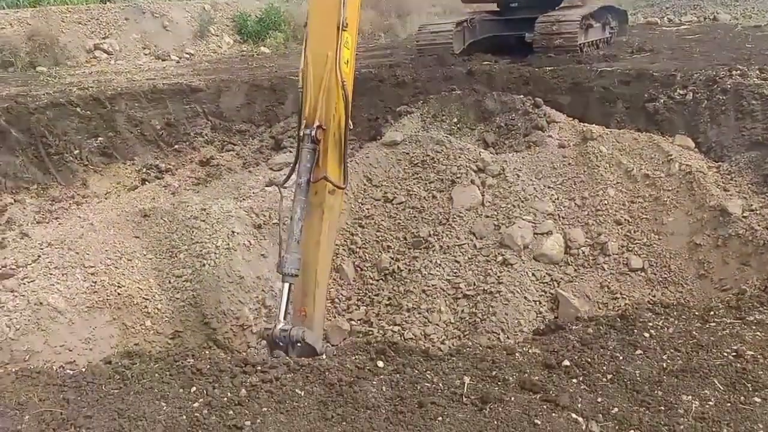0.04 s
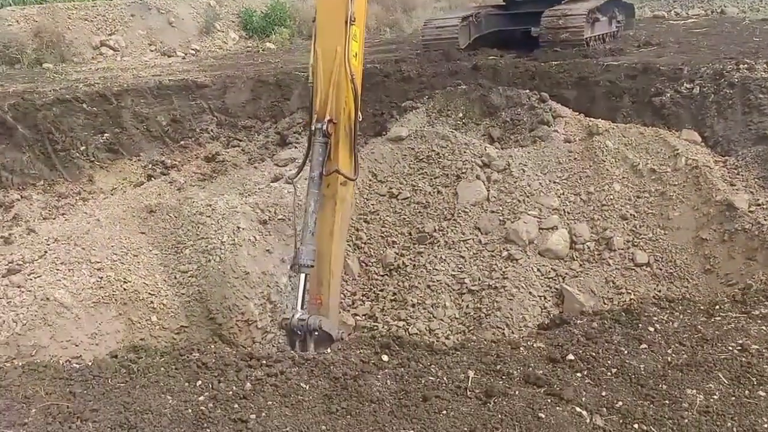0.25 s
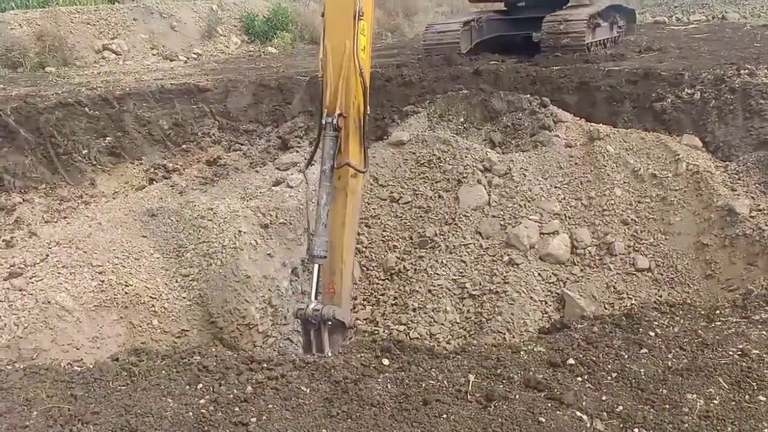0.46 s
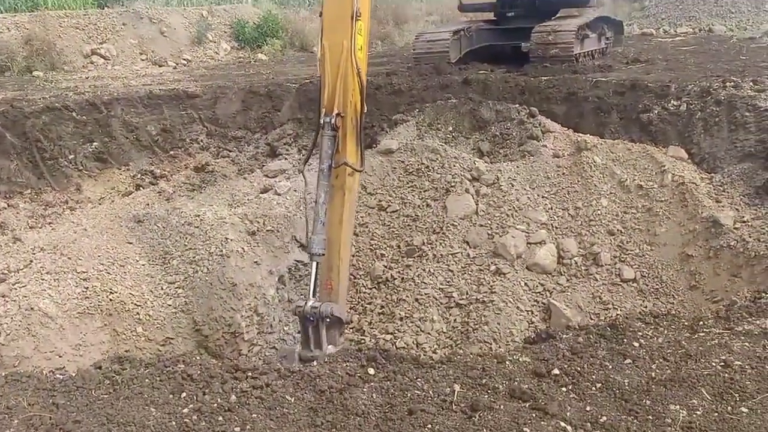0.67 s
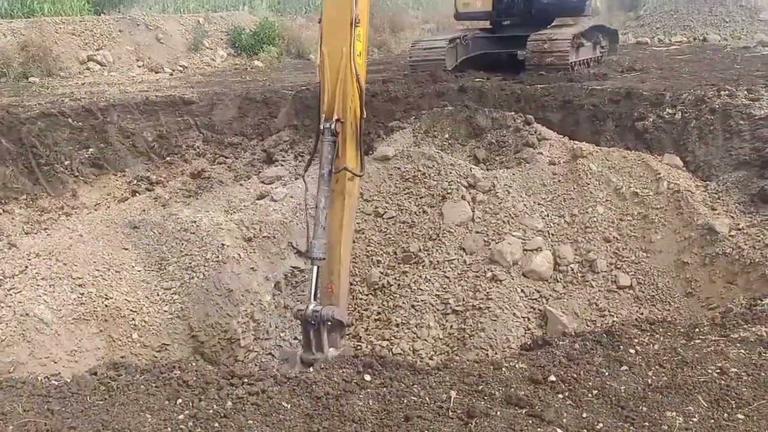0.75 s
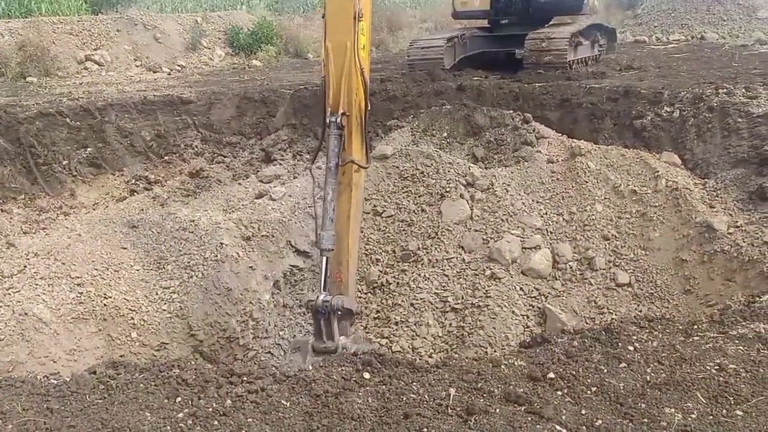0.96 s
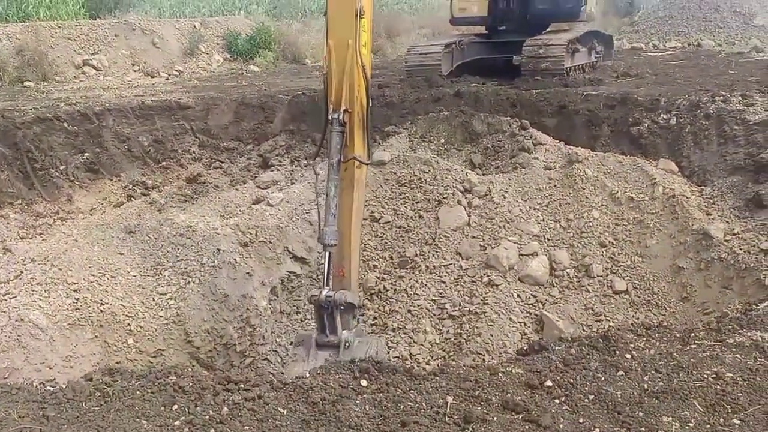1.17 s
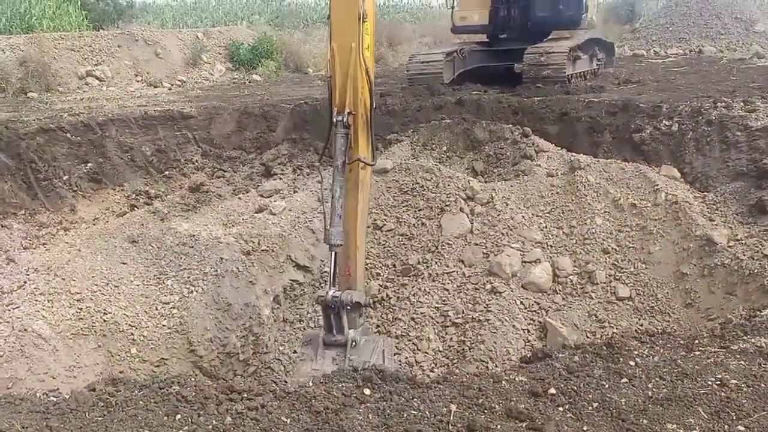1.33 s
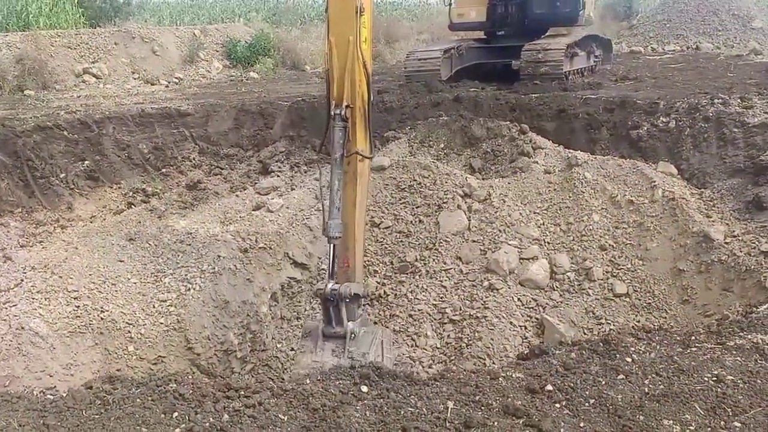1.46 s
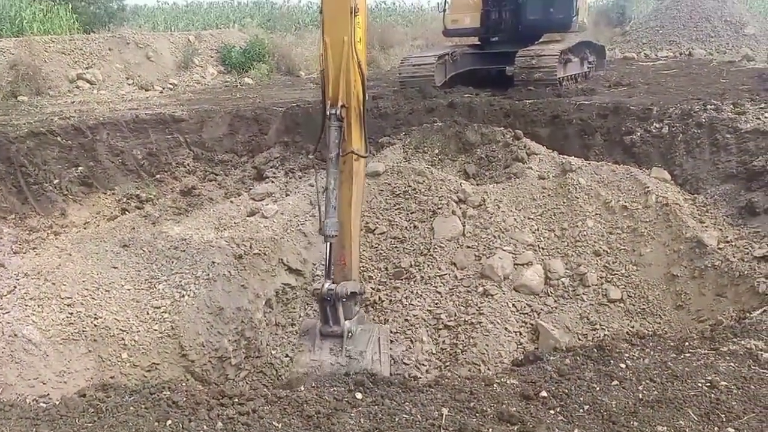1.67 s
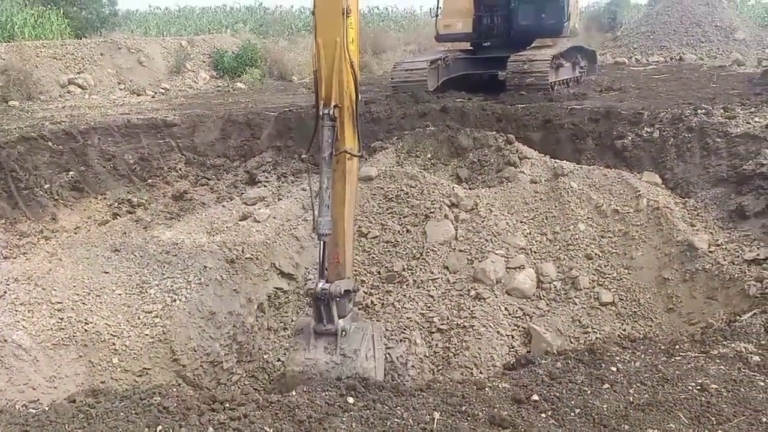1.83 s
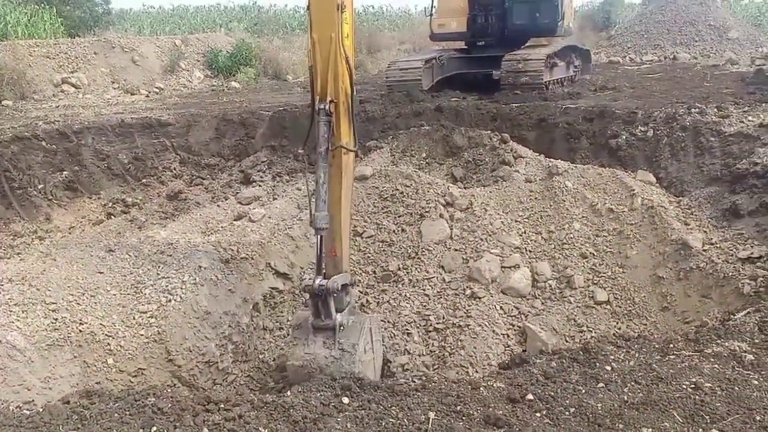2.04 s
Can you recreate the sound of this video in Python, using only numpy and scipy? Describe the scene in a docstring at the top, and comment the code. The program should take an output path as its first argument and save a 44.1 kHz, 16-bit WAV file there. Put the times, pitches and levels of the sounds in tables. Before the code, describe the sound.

An excavator bucket lands with a hard, ringing metallic clang, scrapes through stony soil as gravel trickles and clods thud, then stones clack on the steel over a fading engine hum in an open field, picked up in stereo.

```python
"""Excavator bucket in stony soil

A bucket clangs down and drags through stony soil in an open field: sharp cracks, then ringing steel.
Soil slumps and gravel trickles as shaped noise and tiny grains; clods thud, pebbles tick, a tooth squeaks.
Stones knock on the steel as short clicks, each with a quick echo off the ground and a short scatter.
Behind are wavering sines: the hum of engine and pump fades as the load eases, a hydraulic whine stays."""
import sys
import numpy as np
from scipy import signal
from scipy.fft import rfft, irfft
from scipy.io import wavfile

SR = 44100
rng = np.random.default_rng(int(sys.argv[2]) if len(sys.argv) > 2 else 0)


def wav_record(signal):
    """Record a signal, one row per channel, as 16-bit PCM in the file named by sys.argv[1]."""
    frames = np.transpose(np.atleast_2d(signal))
    bounded = np.clip(frames, -1, 1)
    # unit amplitude maps onto the largest positive 16-bit level
    quanta = np.round(bounded * 32767).astype(np.int16)
    wavfile.write(sys.argv[1], SR, quanta)


N = 92389
TIME = np.arange(N) / SR
SECOND = TIME[:SR]
HZ = np.fft.rfftfreq(2 * N, 1 / SR)
# stereo image of the microphone pair: f/Hz, likeness of diffuse sound (0-1), left minus right/dB
MIC_PAIR = [(60, 0.93, -5), (230, 1, 0.5), (457, 0.97, -2), (870, 0.83, -1.5), (1400, 0.92, -6.5),
            (2300, 0.31, -4.5), (3600, 0.28, 1), (6200, .15, 5)]


def amp(db):
    """Decibels to gain."""
    return 10 ** (np.asarray(db) / 20)


def unit(x):
    """Scales to an rms of one."""
    return x / np.sqrt(np.mean(x ** 2) + 1e-20)


def read(table, hz, axis=1):
    """One column of a table, interpolated on a log-frequency axis."""
    table = np.array(table)
    return np.interp(np.log(hz + 1), np.log(table[:, 0] + 1), table[:, axis])


def level(table, axis=1):
    """Gain over time from one dB column of a curve."""
    table = np.array(table)
    return amp(np.interp(TIME, table[:, 0], table[:, axis]))


def add(mix, s, sound):
    """Mixes a sound in at a time in seconds."""
    part = mix[..., max(round(s * SR), 0):][..., :sound.shape[-1]]
    part += sound[..., :part.shape[-1]]


def pan(db):
    """Left and right gains for a left-minus-right level in dB."""
    return amp(np.array([[db], [-db]]) / 2)


def drift(rate_hz):
    """Random wandering with an rms of one, mostly slower than rate_hz."""
    spectrum = rfft(rng.standard_normal(2 * N))
    return unit(irfft(spectrum * np.exp(-(HZ / rate_hz) ** 2))[:N])


def pair_angle(hz):
    """Angle whose cosine is the likeness of the two microphones."""
    return np.arccos(np.clip(read(MIC_PAIR, hz), -1, 1))


def diffuse(pair, gain):
    """Colours two unrelated signals and blends them as the microphones hear diffuse sound."""
    a, b = rfft(pair, 2 * N) * gain
    turn = pair_angle(HZ) / 2
    tilt = amp(read(MIC_PAIR, HZ, axis=2) / 2)
    common, opposed = a * np.cos(turn), b * np.sin(turn)
    return irfft(np.array([(common + opposed) * tilt, (common - opposed) / tilt]))[:, :N]


def stereo_noise(colour):
    """Steady diffuse noise with the given spectrum."""
    return diffuse(rng.standard_normal((2, N)), amp(read(colour, HZ)))


def click(colour, smear_s=0, size=2048):
    """A causal click of unit energy with the given spectrum; smear_s is the added delay at 3 kHz."""
    hz = np.fft.fftfreq(size, 1 / SR)
    log_gain = np.log(amp(read(colour, abs(hz))))
    minimum_phase = np.exp(np.conj(signal.hilbert(log_gain)))
    smear = np.exp(-1j * np.pi * smear_s * hz * abs(hz) / 3000)  # delay grows with frequency
    fade_out = np.hanning(2 * size)[size:] ** 2
    h = np.fft.ifft(minimum_phase * smear).real * fade_out
    return h / np.linalg.norm(h)


def tail(table, rise_s):
    """A dense stereo ring of unit energy, each band dying at its own speed."""
    hz, t, bands = signal.stft(stereo_noise(table), SR, nperseg=512)
    fade = amp(-60 * t / read(table, hz, axis=2)[:, None])
    h = signal.istft(bands * fade, SR)[1][:, :SR]
    return unit(h * (1 - np.exp(-SECOND / rise_s))) / np.sqrt(SR)


def dying(t60):
    """One second of exponential decay, falling 60 dB in t60 seconds."""
    return np.exp(-np.log(1000) * SECOND / t60)


def through(x, h):
    """Convolves a signal with a stereo response."""
    return signal.fftconvolve(x[None], h, axes=1)[:, :N]


def engine():
    """Firing and pump tones ride one shaft and follow the load, under a steady hydraulic whine."""
    # engine and pump: multiple of the shaft rate, level/dB
    orders = [(3, -12.5), (6, -13.5), (8, -3.5), (9, -2), (10.47, -14), (12.42, -15)]
    # hydraulic whine: multiple of the shaft rate, level/dB
    whine = [(15, -5), (18, -2.5), (27.06, -1.5), (32.7, -3), (37.15, -1)]
    # hum level under the engine load: t/s, level/dB
    load = [(0, -52.5), (.65, -51), (.85, -51), (1.2, -52), (1.5, -57), (1.8, -57), (2.09, -58.5)]
    shaft_hz, shaft_waver = 23.88, 0.003  # waver: rms share of the rate
    hum_waver_db, whine_waver_db, whine_db = 1.3, 2.5, -69.5
    turns = np.cumsum(shaft_hz * (1 + shaft_waver * drift(rate_hz=11))) / SR

    def tones(table, waver_db):
        """Wavering sines on multiples of the shaft rate."""
        total = np.zeros(N)
        for multiple, db in table:
            tone = unit(np.sin(2 * np.pi * (multiple * turns + rng.random())))
            total += amp(db + waver_db * drift(rate_hz=3.9)) * tone
        return total

    hum = tones(orders, hum_waver_db) * level(load) * pan(db=0.9)
    return hum + amp(whine_db) * tones(whine, whine_waver_db) * pan(db=-3.0)


def soil():
    """Soil slumps and scrapes along the bucket while gravel trickles as many tiny grains."""
    # digging: t/s, slump level/dB, scrape level/dB, gravel level/dB
    dig = [(0, -53, -42.5, -48), (.06, -61, -31, -31), (.1, -41.5, -40, -45), (.147, -46.5, -44, -45.5),
           (.162, -50, -38.5, -39), (.21, -61, -42, -42), (.28, -58, -45, -51.5), (.38, -56.5, -48, -53.5),
           (.43, -49.5, -47, -55.5), (.5, -56, -43.5, -50.5), (.62, -53, -46, -54), (.66, -62, -54, -57.5),
           (.9, -67, -57.5, -59), (1.05, -60, -57.5, -58.5), (1.3, -63, -55, -57), (1.5, -60, -60.5, -59.5),
           (1.75, -72.5, -62, -61), (2.09, -67.5, -70, -63)]
    # low rumble of slumping soil: f/Hz, level/dB
    slump_colour = [(20, -31.5), (55, -18.5), (75, -8.5), (110, 2), (150, -0.5), (250, -11), (600, -54),
                    (2000, -79)]
    # soil scraping along the bucket: f/Hz, level/dB
    scrape_colour = [(30, -30), (100, -17), (180, 0), (290, 5.5), (400, -2), (550, -3.5), (780, 0),
                     (1100, -11.5), (1700, -8.5), (4000, -45.5), (9000, -70.5)]
    # trickling gravel: f/Hz, level/dB
    gravel_colour = [(300, -35), (900, 1), (1600, -3.5), (2300, -0.5), (3000, -2.5), (3800, -9),
                     (4600, -23), (6200, -25.5), (7500, -41), (15000, -55.5)]
    scrape_patch_db, gravel_patch_db = 0.93, 2  # rms of the patchy loudness
    grains_per_s, grain_spread_db = 1500, -0.5
    grain_share = 0.38  # share of grain power; the rest is even noise

    slump = unit(stereo_noise(slump_colour))

    patches = amp(scrape_patch_db * drift(rate_hz=16))
    scrape = unit(diffuse(rng.standard_normal((2, N)) * patches, amp(read(scrape_colour, HZ))))

    sizes = amp(grain_spread_db * np.minimum(rng.exponential(1, N), 5))
    sizes *= rng.random(N) < grains_per_s / SR
    power = grain_share * unit(sizes) ** 2 + 1 - grain_share
    grains = np.sqrt(power) * rng.standard_normal((2, N))
    patches = amp(gravel_patch_db * drift(rate_hz=33))
    gravel = unit(diffuse(grains * patches, amp(read(gravel_colour, HZ))))
    return slump * level(dig) + scrape * level(dig, axis=2) + gravel * level(dig, axis=3)


def clods():
    """Heavy clods give way under the bucket, each a soft, low thud that swells and dies."""
    # clods: t/s, level/dB, f/Hz
    clod_list = [(0.08, -43.5, 104), (0.082, -37.5, 293.6), (.195, -48.5, 82), (0.359, -49, 98),
                 (0.594, -53, 113)]
    rise_s = 0.022  # time to the peak of the swell
    out, u = np.zeros(N), SECOND / rise_s
    swell = u * np.exp(1 - u)
    for s, db, hz in clod_list:
        add(out, s, amp(db) * swell * np.sin(2 * np.pi * (hz * SECOND + rng.random())))
    return out * pan(db=-2.5)


def pebbles():
    """Pebbles tick with one short, broad resonance each; the soft soil dulls their top."""
    # small pebbles landing: t/s, level/dB, f/Hz
    pebble_list = [(.088, -12.5, 3600), (0.1543, -11, 2620), (0.16, -15.5, 2800), (.372, -40, 3560),
                   (.3817, -26, 3600), (0.4334, -24.5, 2900), (.7194, -30, 2060), (0.7508, -30, 2860),
                   (0.8137, -34, 2640), (0.8892, -24.5, 1820), (.899, -30.5, 2830), (.9394, -31.5, 1900),
                   (.9509, -38, 2080), (1.0241, -35, 1880), (1.2238, -40, 2820), (1.6274, -32.5, 3650)]
    width, top_hz = 0.065, 4400  # half-width of the resonance as a share of its pitch; treble limit
    t60, rise_s = 0.05, 0.0012
    out = np.zeros((2, N))
    burst = dying(t60) * (1 - dying(t60 / 10))
    onset = np.minimum(SECOND / rise_s, 1)
    for s, db, hz in pebble_list:
        resonance = 1 / (1 + ((HZ / hz - 1) / width) ** 2)
        dulling = 1 / (1 + (HZ / top_hz) ** 12)
        tick = diffuse(rng.standard_normal((2, SR)) * burst, resonance * dulling)[:, :SR]
        add(out, s, amp(db) * unit(tick * onset) / np.sqrt(SR))
    return out


def squeaks():
    """A steel tooth sings briefly as it slides on a stone: a thin, unsteady sine."""
    # squeaks: t/s, length/s, level/dB
    squeak_list = [(.083, 0.21, -60.5), (.58, 0.12, -76.5), (0.765, 0.052, -69.5)]
    pitch_hz, waver = 5940, 0.004  # waver: rms share of the pitch
    out = np.zeros(N)
    for s, length, db in squeak_list:
        u = np.clip((TIME - s) / length, 0, 1)
        swell = np.sin(np.pi * np.sqrt(u))  # quick rise, slower fall
        wavering_hz = pitch_hz * (1 + waver * drift(rate_hz=110))
        out += amp(db) * swell * unit(np.sin(2 * np.pi * np.cumsum(wavering_hz) / SR))
    return out * pan(db=1.0)


def knocks():
    """Each stone on the steel gives a dry clack, its echo off the ground, a faint ring and a short scatter."""
    # stones on the bucket: t/s, level/dB, delay of the ground echo/s, sharpness (0-1)
    knock_list = [(.4920, -1.5, .00215, 0), (0.568, -1.5, 0.0025, 0), (1.1186, 1.5, 0.0022, 0),
                  (1.2667, -0.5, 0.0022, .1), (1.2765, -3, .00225, 0.25), (1.3789, -3, 0.002, 0.24),
                  (1.3978, -4, 0.00226, 0.4), (1.7312, -4.5, .0014, 1), (1.74, -6.5, .0014, 0.6),
                  (1.8244, -6, .0014, 0.92)]
    # colour of a knock: f/Hz, dull level/dB, sharp level/dB
    knock_colour = [(200, -30, -25.5), (558, -20, -19.5), (735, 2.5, -3.5), (1100, -35, -17),
                    (1430, -11.5, -18.5), (1770, -4.5, -0.5), (2265, 1, 4.5), (2500, -15.5, -2.5),
                    (3250, -19.5, -6.5), (4000, -22, -15.5), (4780, -25.5, -18.5), (5820, -47, -20.5),
                    (7300, -54, -47), (15000, -62, -52)]
    # scatter off the soil banks: f/Hz, level/dB, t60/s
    scatter = [(300, 8.5, 0.34), (800, -1, 0.1), (1520, 0, 0.086), (2090, -2.5, 0.078), (3320, 0.5, 0.12),
               (5000, -5, 0.089), (9000, 5, 0.075)]
    knock_db, echo_db, scatter_db, smear_s = -12.5, 0, 0, 0.00076
    ring_hz, ring_t60, ring_db = 2444, 0.27, -55
    clacks, rings = np.zeros(N), np.zeros(N)
    ring = np.sin(2 * np.pi * ring_hz * SECOND) * dying(ring_t60)
    for s, db, echo_s, sharpness in knock_list:
        colour = [(hz, dull + (sharp - dull) * sharpness) for hz, dull, sharp in knock_colour]
        clack = amp(knock_db + db) * click(colour, smear_s)
        add(clacks, s, clack)
        add(clacks, s + echo_s, amp(echo_db) * clack)
        add(rings, s, amp(ring_db + db) * ring)
    scattered = amp(scatter_db) * through(clacks, tail(scatter, rise_s=0.0028))
    return pan(db=-3) * (clacks + rings) + scattered


def bucket():
    """The bucket lands and chatters: cracks, then the dense ring and clear modes of the steel."""
    # blows of the bucket: t/s, level/dB
    blows = [(.0132, -29.5), (0.0135, 2), (0.0161, 1), (0.0174, -14), (.021, -13), (0.0264, -5),
             (0.0306, -15.5), (.155, -26)]
    # crack of a blow: f/Hz, level/dB
    crack_colour = [(100, -40), (400, -17.5), (1000, -9.5), (1600, 1.5), (2100, -13), (2500, 9), (3000, -2),
                    (3650, 3), (4400, -14.5), (5800, -25.5), (7500, -45), (15000, -58)]
    # dense ring of bucket and arm: f/Hz, level/dB, t60/s
    ring = [(50, -59, 0.35), (133, 3.5, 1), (297, -9.5, 1), (600, 8.5, 0.26), (1100, -11, 0.47),
            (2400, 2.5, 0.38), (3880, 10, 0.16), (4470, -8, 0.23), (6000, -13.5, .25), (7800, -46, .3),
            (15000, -43, .4)]
    # clear modes of the bucket: f/Hz, level/dB, t60/s
    steel = [(283, -13, .9), (344, -14, .7), (410, -10, 1), (439.5, -4, .7), (468, -10, .7), (792, -4, .5),
             (868, -11, .7), (1087, -9, .45), (1244, -11, .4), (1453, -9, .3), (1587, -8, .6),
             (1658, -9, .45), (1975, -1, .27), (2396, -6, .35), (2444, 0, .3), (2686, -1, .18),
             (2967, 0, .21), (3247, 0, .19), (3497, 1, .2), (3690, -4, .23), (4085, -10, .16)]
    crack_db, ring_db, steel_db = 6.5, 5, -31
    ring_rise_s = 0.0016
    out = np.zeros((2, N))
    crack = amp(crack_db) * pan(db=-1.5) * click(crack_colour, smear_s=0.000873)
    for s, db in blows:
        add(out, s, amp(db) * crack)

    s, db = blows[1]  # the loudest blow sets the steel ringing
    add(out, s, amp(db + ring_db) * tail(ring, ring_rise_s))
    onset = 1 - np.exp(-SECOND / ring_rise_s)
    for hz, mode_db, t60 in steel:
        # the phase gap between the ears follows the likeness of the pair
        phase = 2 * np.pi * rng.random() + np.array([[.5], [-.5]]) * pair_angle(hz)
        mode = np.sin(2 * np.pi * hz * SECOND + phase) * dying(t60) * onset
        add(out, s, amp(db + steel_db + mode_db) * pan(read(MIC_PAIR, hz, axis=2)) * mode)
    return out


def scene():
    """All the sources together."""
    return engine() + soil() + clods() + pebbles() + squeaks() + knocks() + bucket()


def record(dry):
    """Sound reaches the left microphone slightly later; then the recorder's band limit."""
    left_lag_s, edge_hz = 0.000042, 15300
    lag = np.exp(-2j * np.pi * HZ * left_lag_s)
    left = irfft(rfft(dry[0], 2 * N) * lag)[:N]
    lowpass = signal.firwin(511, edge_hz, window=("kaiser", 9), fs=SR)
    return signal.oaconvolve(np.array([left, dry[1]]), lowpass[None], "same")


dry = scene()
out = record(dry)
wav_record(out)
```